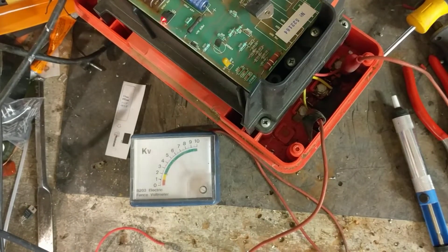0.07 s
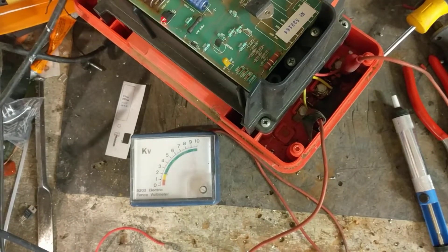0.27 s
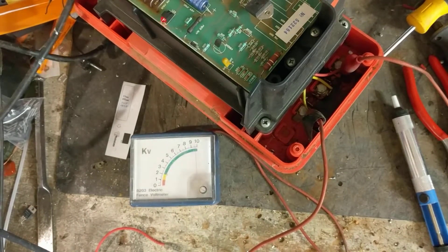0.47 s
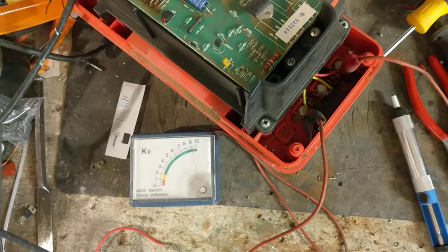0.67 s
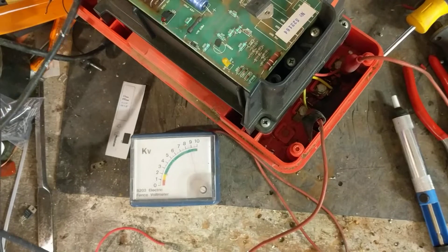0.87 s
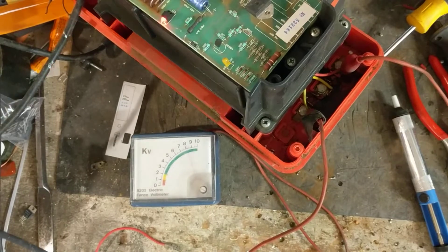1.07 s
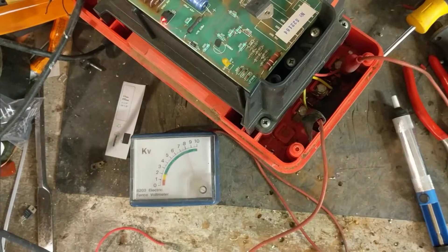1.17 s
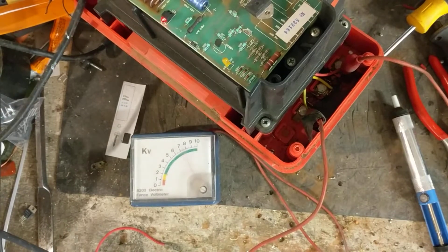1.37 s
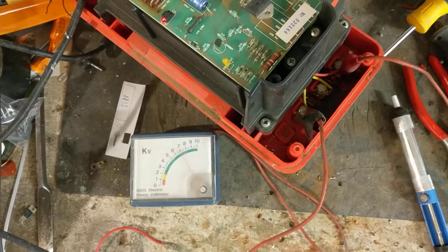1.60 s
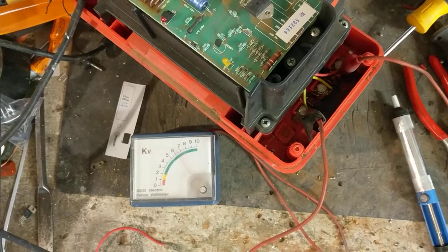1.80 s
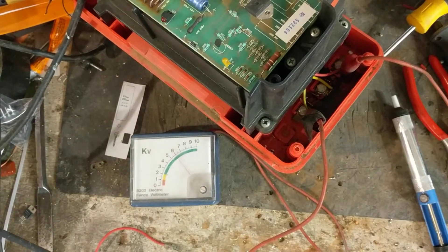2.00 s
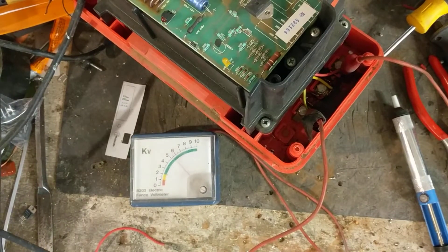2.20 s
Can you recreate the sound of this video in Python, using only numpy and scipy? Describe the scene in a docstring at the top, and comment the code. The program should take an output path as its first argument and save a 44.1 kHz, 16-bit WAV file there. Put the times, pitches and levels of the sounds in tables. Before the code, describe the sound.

One hard electric snap from an open fence charger, over faint hum and dull grip bumps

```python
"""One sharp snap with a ringing plastic case, amid low thumps, dull knocks, tiny ticks, hum and room air.
An open fence charger on a workshop bench fires one pulse: noise bursts plus decaying case modes.
The hand that holds the camera shifts: sagging low swings and rumble; struck modes, noise ticks and
grainy brushes on the camera's shell. Mains tones and a converter whine waver; air is shaped noise."""
import sys
import numpy as np
from scipy import signal
from scipy.fft import rfft, irfft
from scipy.io import wavfile
from scipy.ndimage import uniform_filter1d

SR = 44100
rng = np.random.default_rng(int(sys.argv[2]) if len(sys.argv) > 2 else 0)


def to_wav(sig):
    """Store sig (one row per channel, or 1-D mono) as 16-bit WAV at the path in sys.argv[1].

    Samples outside -1..1 are clipped; the rate is SR.
    """
    pcm = np.clip(np.atleast_2d(sig), -1, 1) * 32767
    pcm = np.round(pcm).astype(np.int16)
    wavfile.write(sys.argv[1], SR, pcm.T)  # frames by channels


def elevation(decibels):
    """Turn decibel levels (scalar or array-like) into linear amplitude ratios."""
    levels = np.asarray(decibels, float)
    return 10 ** (levels / 20)


N = 99225


def evened(x):
    """Scales to rms 1."""
    return x / np.sqrt(np.mean(x ** 2) + 1e-20)


def add(mix, start_s, sound):
    """Adds a sound at a time, cut at the end of the mix."""
    at = round(start_s * SR)
    part = mix[max(at, 0):][:len(sound)]
    part += sound[:len(part)]


def band(x, hz, width_hz):
    """Resonance: shift to 0 Hz, two one-pole low-passes, shift back."""
    turn = np.exp(2j * np.pi * hz * np.arange(len(x)) / SR)
    r = np.exp(-np.pi * width_hz / SR)
    once = signal.lfilter([1 - r], [1, -r], x / turn)
    twice = signal.lfilter([1 - r], [1, -r], once)
    return 2 * (turn * twice).real


def hiss(points, size):
    """Noise of rms 1; spectrum interpolated over log frequency."""
    f, db = np.transpose(points)
    hz = np.fft.rfftfreq(size, 1 / SR)
    gain = elevation(np.interp(np.log(hz + 1), np.log(f + 1), db))
    return evened(irfft(rfft(rng.standard_normal(size)) * gain, size))


def wavering(hz, db, waver_hz):
    """Sine of rms db whose pitch drifts at random by waver_hz rms."""
    drift = waver_hz * evened(uniform_filter1d(rng.standard_normal(N), 2000))
    cycles = np.cumsum(hz + drift) / SR + rng.random()
    return np.sqrt(2) * elevation(db) * np.sin(2 * np.pi * cycles)


def swell(t, rise_s):
    """Smooth rise from 0 to 1."""
    return 1 - np.exp(-(t / rise_s) ** 2)


def decay(t, db, t60_s):
    """Exponential fade from db, losing 60 dB in t60_s."""
    return elevation(db - 60 * t / t60_s)


def pulse():
    """The snap: bright spark, case modes (low ones swell later), noisy crack, bench echo, faint room tail."""
    # case and board modes: f/Hz, level re ring_db/dB, t60/s
    case_modes = [(575, -12, .06), (660, -9, .055), (1030, -6, .052), (1290, -9, .045), (1450, -6, .05),
                  (1990, -6, .06), (2085, 4, .018), (2530, -5, .04), (2750, -4, .03), (3130, -6, .03),
                  (3390, -6, .04), (4150, -5, .028), (5320, -7, .03), (12000, -15, .014),
                  (15200, -11, .014)]
    # crack, echo and tail spectrum: f/Hz, relative level/dB per Hz
    crack_spectrum = [(400, -30), (540, -10), (830, -20), (1080, -6), (1650, -8), (1960, -4), (3400, -9),
                      (5400, -19), (16000, -38)]
    # spark spectrum: f/Hz, relative level/dB per Hz
    spark_spectrum = [(4000, -31), (8000, 1), (15600, -8), (16600, -50)]
    start_s, rise_s, spark_rise_s = 1.1172, .0016, .001
    ring_db, rise_cycles = -29.5, 1.6  # each mode's rise grows by this many of its cycles
    t = np.arange(SR // 2) / SR
    ring = sum(swell(t, rise_s + rise_cycles / hz) * decay(t, db, t60_s) * np.sin(2 * np.pi * hz * t)
               for hz, db, t60_s in case_modes)
    crack, echo, tail = decay(t, -32, .033), decay(t, -39, .085), decay(t, -61.5, .93)
    noise = swell(t, rise_s) * (crack + echo + tail) * hiss(crack_spectrum, len(t))
    spark = swell(t, spark_rise_s) * decay(t, -41, .017) * hiss(spark_spectrum, len(t))
    out = np.zeros(N)
    add(out, start_s, spark + elevation(ring_db) * ring + noise)
    return out


def rumble():
    """Grip rumble: low resonant noise under a moving level."""
    # level curve: t/s, level/dB
    rumble_curve = [(0.0, -45.5), (0.23, -63), (0.37, -40), (0.44, -41.5), (0.71, -43.5), (1.1, -45),
                    (1.24, -50), (1.95, -55), (2.14, -48.5), (2.25, -56.5)]
    s, db = np.transpose(rumble_curve)
    t = np.arange(N) / SR
    return elevation(np.interp(t, s, db)) * evened(band(rng.standard_normal(N), 62, 26.7))


def thumps():
    """Grip thumps: short swings of falling pitch in rough noise, which is stronger for high pitches."""
    # thumps: centre t/s, envelope level/dB, f at centre/Hz, 1/e half-width of the fall/cycles
    thump_table = [(0.219, -28, 80.4, 1.56), (0.29, -33.5, 90, 1.7), (0.31, -26, 111, 0.86),
                   (0.334, -27.5, 63.7, 1.73), (0.347, -39.5, 167, 1.8), (0.381, -28, 62, 1.1),
                   (0.447, -33, 80, 0.94), (.457, -45, 192, 0.25), (0.473, -26.5, 63.5, 0.28),
                   (0.496, -32.5, 127, 0.55), (0.536, -33.5, 195, 0.81), (0.555, -25.5, 66.4, 1),
                   (0.578, -24, 111, 0.77), (0.622, -33, 55, 0.26), (0.684, -41, 110, 1.1),
                   (0.829, -31.5, 93.5, 0.51), (0.851, -34, 64.4, 0.58), (0.894, -37, 95, 2.3),
                   (0.93, -23, 184, 0.51), (0.96, -25.5, 119, 1.1), (0.982, -49.5, 284, 1.6),
                   (0.987, -31.5, 69.4, 0.78), (1.002, -34, 165, 1), (1.014, -23, 64, 1.36),
                   (1.062, -40.5, 113, 1.4), (1.155, -34.5, 68.4, 1.17), (1.217, -36, 83, 1.4),
                   (1.478, -38.5, 117, 1.13), (1.666, -32.5, 112, 0.81), (1.679, -29, 91.4, 1.12),
                   (1.704, -35, 62, 1.75), (1.963, -36, 97, 1.26), (1.985, -38, 88, 0.91),
                   (2.234, -40, 55, 0.93)]
    sag, onset = .54, .6  # pitch fall; rise width as a share of fall width
    scrub_db, scrub_s, scrub_hz, scrub_width_hz = -16, .012, 191, 100  # level re thump at scrub_hz
    t = np.arange(N) / SR
    scrub = elevation(scrub_db) * evened(band(rng.standard_normal(N), scrub_hz, scrub_width_hz))
    out = np.zeros(N)
    for centre_s, db, hz, cycles in thump_table:
        u = np.clip((t - centre_s) * hz, -8, 8)  # cycles from centre
        envelope = np.exp(-(u / (cycles * np.where(u < 0, onset, 1))) ** 2)
        swing = envelope * np.cos(2 * np.pi * (u - sag * u * np.tanh(u) / 2 + rng.random()))
        rough = scrub * hz / scrub_hz * np.exp(-((t - centre_s) / scrub_s) ** 2)
        out += elevation(db) * (swing + rough)
    return out


def knocks():
    """Dull knocks: each blow excites most the shell modes near its favoured frequency."""
    # knocks: t/s, level/dB of a mode at the favoured f before rise and decay, favoured f/Hz
    knock_table = [(.487, -48, 1050), (.497, -48, 600), (.926, -41, 480), (1.377, -55, 850),
                   (1.381, -49, 420), (1.388, -59, 900), (1.91, -56, 1500)]
    # shell modes: f/Hz
    shell_modes = [458, 807, 1093, 1600]
    t60_s, reach_octaves, rise_s = .033, .65, .002
    t = np.arange(3000) / SR
    out = np.zeros(N)
    for s, db, favoured_hz in knock_table:
        body = sum(np.exp(-(np.log2(hz / favoured_hz) / reach_octaves) ** 2)
                   * np.sin(2 * np.pi * (hz * t + rng.random())) for hz in shell_modes)
        add(out, s, decay(t, db, t60_s) * np.minimum(t / rise_s, 1) * body)
    return out


def ticks():
    """Shell ticks: abrupt, fast-fading bursts of treble noise."""
    # ticks: t/s, initial level/dB rms
    tick_table = [(0.2204, -64), (0.2345, -68), (0.248, -66), (0.261, -65.5), (0.373, -66), (0.3824, -67),
                  (1.363, -61), (1.436, -64.5), (1.4691, -66), (1.4926, -67), (1.502, -62.5), (2.0577, -67)]
    tick_hz, width_hz, t60_s = 7500, 7000, .011
    t = np.arange(3000) / SR
    out = np.zeros(N)
    for s, db in tick_table:
        noise = evened(band(rng.standard_normal(len(t)), tick_hz, width_hz))
        add(out, s, decay(t, db, t60_s) * noise)
    return out


def brushes():
    """Cloth or skin brushing the shell: a spray of tiny slips modulates low-passed noise."""
    # brushes: centre t/s, 1/e full width/s, level before low-pass/dB, low-pass f/Hz
    brush_table = [(0.301, 0.0059, -64.5, 12000), (0.318, 0.0063, -62, 16000), (0.334, 0.012, -66.5, 8900),
                   (0.316, 0.17, -72, 9900), (1.476, 0.26, -74, 10000), (1.697, 0.047, -63.5, 5000)]
    # brush spectrum: f/Hz, relative level/dB per Hz
    brush_spectrum = [(1200, -8), (3000, 0), (6000, -6), (9000, -8), (15000, -17)]
    grains_per_s, spread_db = 5000, 3
    t = np.arange(N) / SR
    slip_gain = elevation(spread_db * np.minimum(rng.exponential(1, N), 4))
    slips = (rng.random(N) < grains_per_s / SR) * slip_gain
    rub = evened(uniform_filter1d(slips, size=30)) * hiss(brush_spectrum, N)
    out = np.zeros(N)
    for centre_s, width_s, db, top_hz in brush_table:
        envelope = np.exp(-(2 * (t - centre_s) / width_s) ** 2)
        out += elevation(db) * envelope * signal.lfilter(*signal.butter(2, top_hz, fs=SR), rub)
    return out


def hum():
    """Steady tones: mains hum and a faint high tone, each wavering in pitch."""
    # tones: f/Hz, level/dB rms, waver/Hz rms
    hum_tones = [(120, -55, 0.55), (235.7, -73, 5.2), (11840, -96.5, 67)]
    return sum(wavering(*tone) for tone in hum_tones)


def whine():
    """Converter whine, which drops after the pulse and climbs back a little later."""
    # pitch curve: t/s, f/Hz
    whine_curve = [(0, 8150), (1.34, 8150), (1.35, 7900), (1.6, 7900), (2.25, 8110)]
    hz = np.interp(np.arange(N) / SR, *np.transpose(whine_curve))
    return wavering(hz, db=-92, waver_hz=22)


def fading_ring():
    """Thin sine dying away from the start."""
    t = np.arange(N) / SR
    return decay(t, -64, .6) * np.sin(2 * np.pi * 1410 * t)


def air():
    """Room air: steady shaped noise."""
    # air spectrum: f/Hz, relative level/dB per Hz
    air_spectrum = [(30, -46), (60, -13.5), (127, -4), (150, -18), (245, -19.5), (310, -27), (450, -23),
                    (900, -26), (2500, -33), (5000, -40.5), (9000, -49.5), (15500, -56.5)]
    return elevation(-60) * hiss(air_spectrum, N)


def scene():
    """Sums all sources into one channel."""
    handling = rumble() + thumps() + knocks() + ticks() + brushes()
    return (pulse() + handling + hum() + whine() + fading_ring() + air())[None]


def roll_off(x):
    """The treble ends steeply here."""
    return signal.sosfilt(signal.butter(12, 16490, fs=SR, output="sos"), x)


def record(dry):
    """Microphone: a second-order high-pass cuts the deepest bass."""
    low_cut_hz = 55
    mix = signal.lfilter(*signal.butter(2, low_cut_hz, "high", fs=SR), dry)
    return roll_off(mix)


dry = scene()
out = record(dry)
to_wav(out)
```